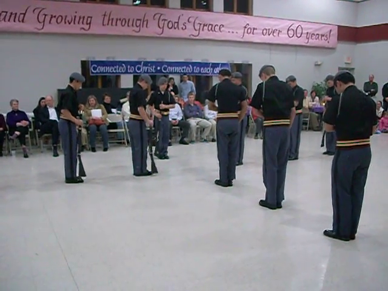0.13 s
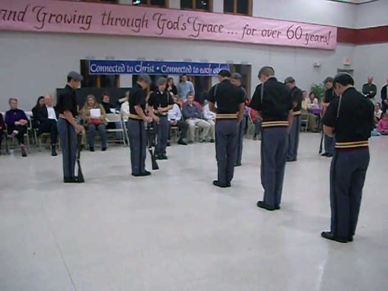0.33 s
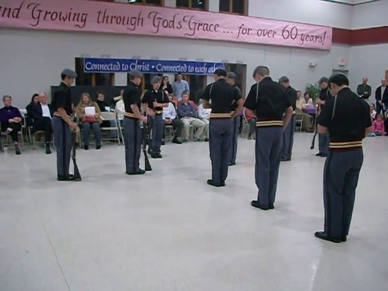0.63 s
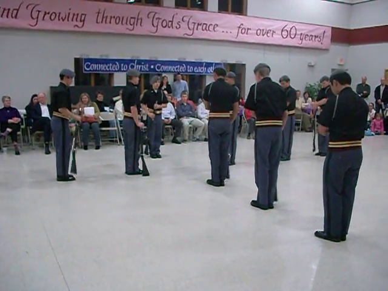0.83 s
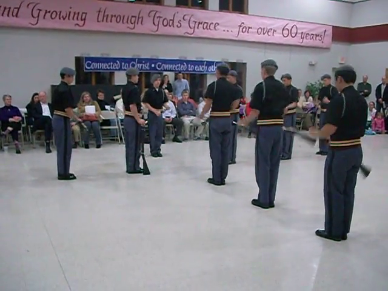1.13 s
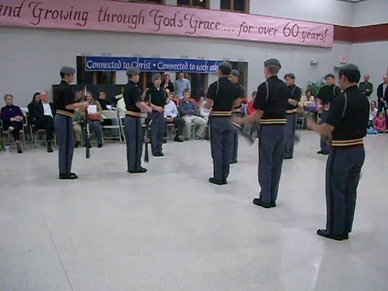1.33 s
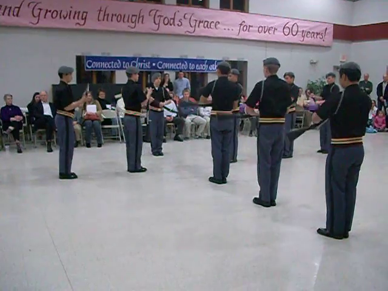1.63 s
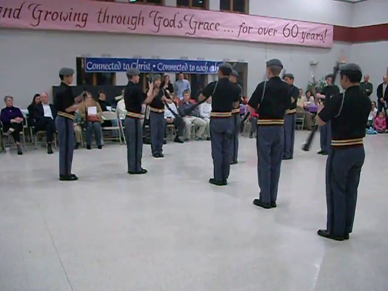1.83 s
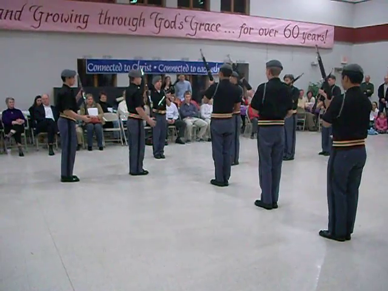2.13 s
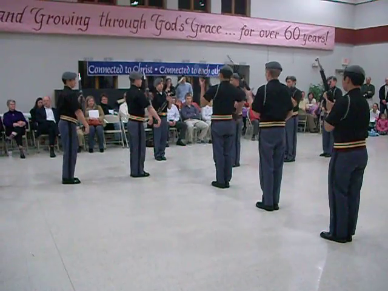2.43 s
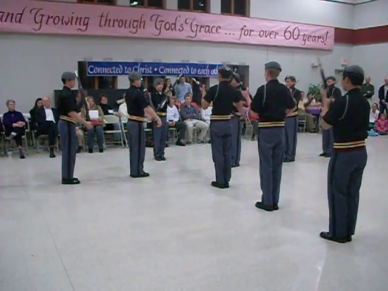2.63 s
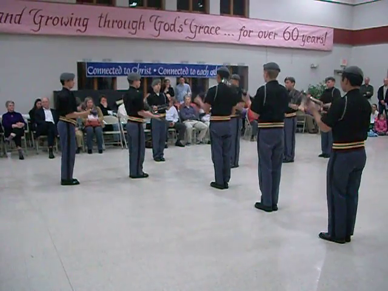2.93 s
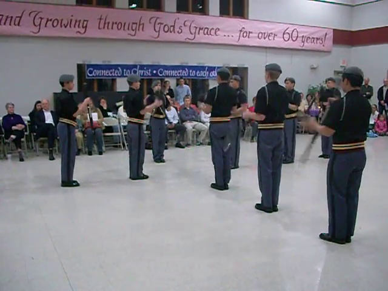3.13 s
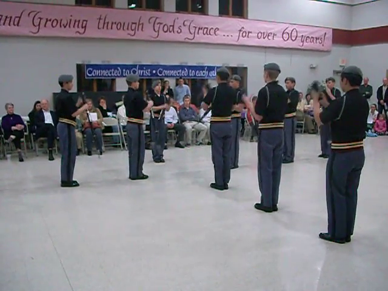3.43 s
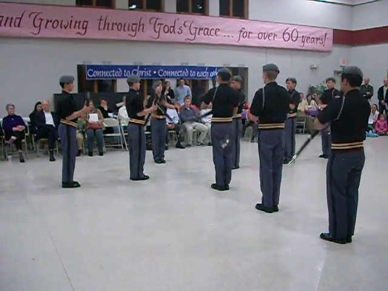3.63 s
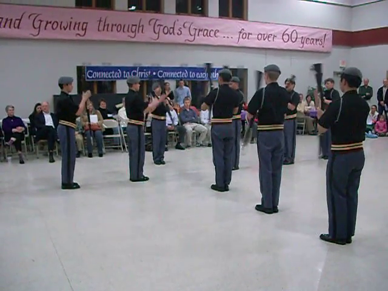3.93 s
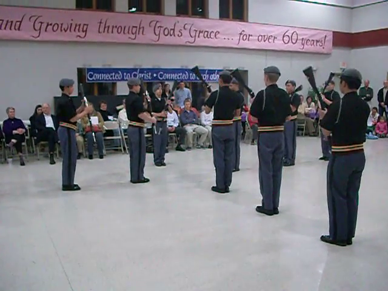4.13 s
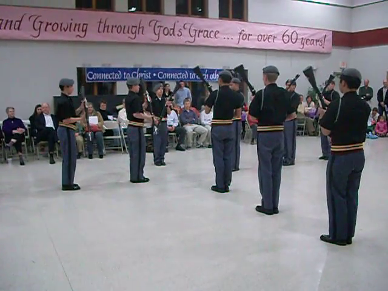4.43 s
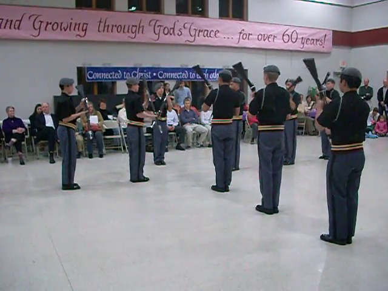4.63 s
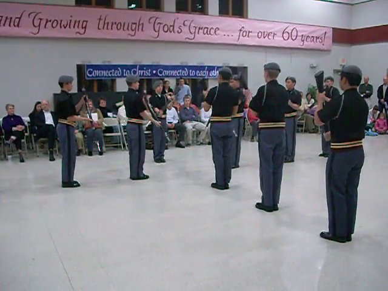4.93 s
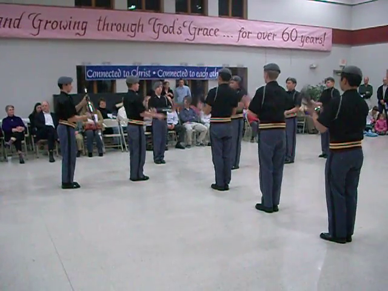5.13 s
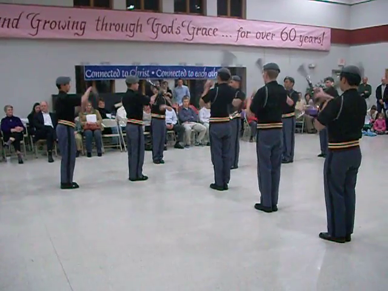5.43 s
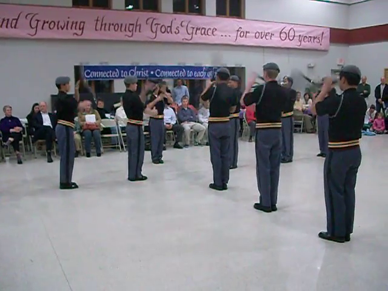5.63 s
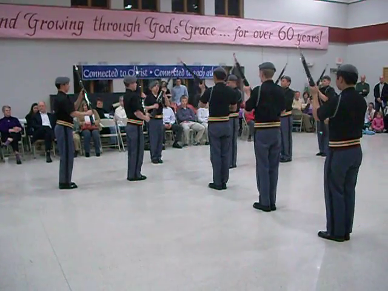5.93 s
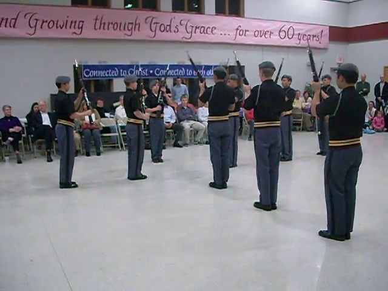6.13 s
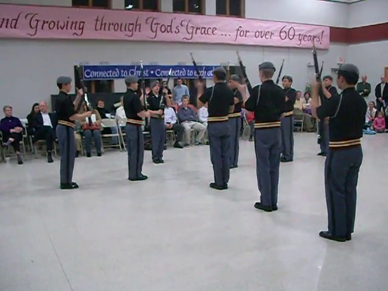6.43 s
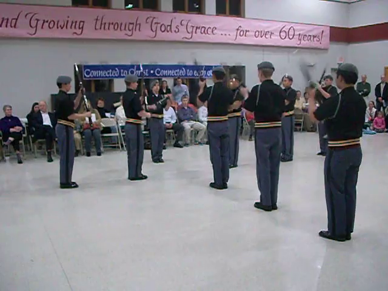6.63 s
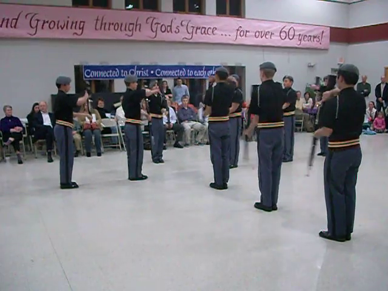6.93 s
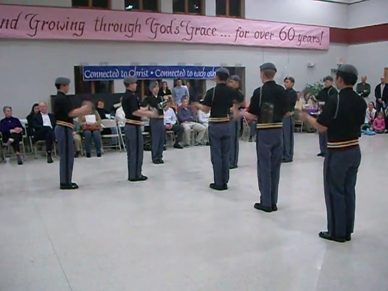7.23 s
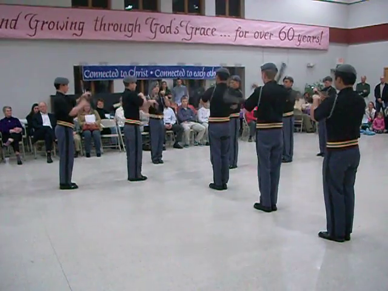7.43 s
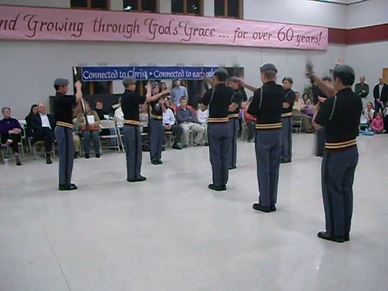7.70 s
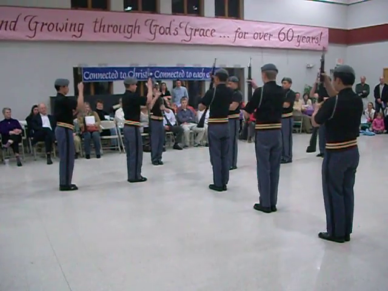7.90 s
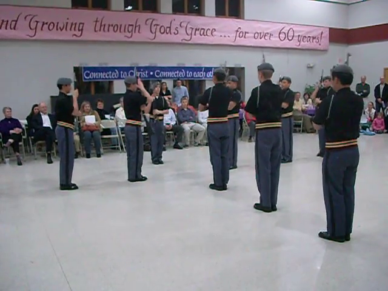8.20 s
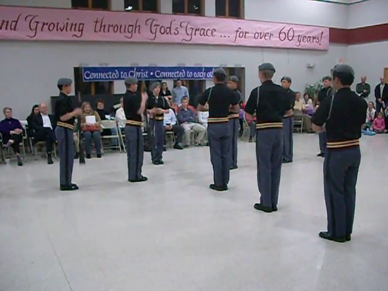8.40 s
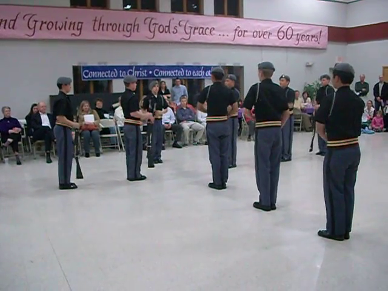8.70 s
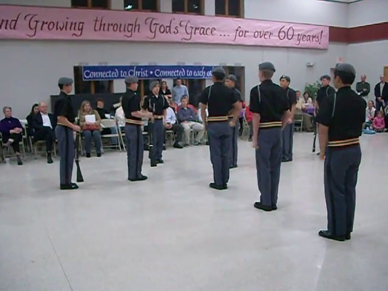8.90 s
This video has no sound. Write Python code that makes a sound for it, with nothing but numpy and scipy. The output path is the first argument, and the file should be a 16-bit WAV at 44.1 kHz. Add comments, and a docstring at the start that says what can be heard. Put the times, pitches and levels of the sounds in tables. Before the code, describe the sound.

A drill team handles rifles in a hard-floored hall, heard from a short distance on a small, narrow-band camera microphone over steady low ventilation rumble and faint hiss. Immediately at 0 s, then at about 0.4 and 0.8 s, loud ragged volleys of rifle butts boom on the floor, mixed with bright cracks and a little steel ring, distorting at the peaks. A looser clack follows at 1.6 s. Softer slaps come at 2.0, 2.45 and 2.85 s, growing at 3.3 and 3.7 to a strong woody burst at 4.07 s. A weak one follows at 4.85 s, a hard crack at 5.75, a medium clatter at 6.5, and the loudest clack at 7.7 s. Small swivel ticks fill gaps. Each burst smears over about a tenth of a second and leaves under a second of echo. After a quiet pause, one faint tap and thud lands at 8.93 s.

```python
"""Rifles handled by a drill team, never quite in unison, in a hard-floored hall.
Clacks layer a noise crack, a hollow knock, a rattle and ringing modes; they come in ragged bursts.
Early on, three volleys of butts thud as floor modes, plate ring and low noise; a faint one comes late.
The hall answers with sparse reflections and a banded noise tail, over ventilation of coloured noise.
A small camera with a narrow band overloads on the loudest blows."""
import sys
import numpy as np
from scipy import signal
from scipy.fft import rfft, irfft, next_fast_len
from scipy.io import wavfile
from scipy.ndimage import uniform_filter1d

SR = 44100
rng = np.random.default_rng(int(sys.argv[2]) if len(sys.argv) > 2 else 0)


def to_wav(s):
    """Save 16-bit WAV."""
    ch = np.atleast_2d(s).T  # columns
    pcm = np.round(np.clip(ch, -1, 1) * 32767)  # PCM
    wavfile.write(sys.argv[1], SR, pcm.astype(np.int16))


N = 399546  # samples

# Levels in the tables are set ahead of the hall mix and the camera.
# clacks that stand out of their move: start_s, level_db, nearness_db
LOUD_CLACKS = [(0.002, -2.5, -4.5), (0.045, -2, -1.5), (0.083, -10, 6), (0.099, -9, 4), (0.355, -7.5, -2.5),
               (0.391, -6, 2), (0.402, -7, 1), (0.461, -3, 1.5), (0.699, -7.5, 0.5), (0.766, -3.5, -2),
               (0.786, -3.5, 1), (0.8, -8.5, 4), (0.841, -4.5, 6), (1.558, -22, 4.5), (1.57, -15.5, 5.5),
               (1.595, -6.5, 0), (1.636, -8, -2.5), (1.65, -7, 3), (2.003, -19.5, 3.5), (2.059, -16.5, -2),
               (2.464, -13.5, 3), (2.506, -19.5, -2.5), (2.842, -23.5, 3.5), (2.888, -17.5, -12),
               (2.91, -12.5, 1), (3.217, -18, 2.5), (3.26, -11, 0), (3.275, -10, -2), (3.312, -9, -2),
               (3.634, -12, -6.5), (3.67, -10, -0.5), (3.693, -5, 2), (4.052, -3.5, -1.5),
               (4.06, -2.5, 2.5), (4.075, -7.5, 0.5), (4.115, -8, -1), (4.82, -21, -6), (4.88, -11.5, -6),
               (4.913, -14, 3.5), (5.708, -5.5, -1.5), (5.729, -1.5, -7), (5.774, -3, 2.5),
               (5.794, -4, 8.5), (6.457, -8.5, -9.5), (6.471, -7.5, -0.5), (6.5, -5, 1), (6.549, -13, -4),
               (6.577, -10.5, -3), (7.673, -23.5, 1), (7.693, 1, 3.5), (7.705, 4.5, 2.5), (7.724, 1.5, -3),
               (7.745, -0.5, 7.5), (7.768, -5, 2), (8.933, -32, 9)]
# drill moves, each a ragged burst of contacts along the ranks:
# start_s, length_s, contact_level_db, body_db (wooden), edge_db (metallic), knock_hz, knock_db
DRILL_MOVES = [(0.005, 0.098, -13.5, -2.5, -4.5, 1450, -14.5), (0.369, 0.1, -11.5, -2.5, -5, 1280, -9.5),
               (0.767, 0.081, -10.5, -3.5, -4.5, 1402, -12.5),
               (1.589, 0.074, -15.5, -7.5, -5.5, 664, -12.5), (2.023, 0.071, -24.5, 1.5, -2, 1280, -14),
               (2.416, .1, -23, -5, -13, 978, -8), (2.808, 0.094, -22.5, -5.5, -5.5, 1140, -16),
               (3.263, 0.079, -16, -4, -8, 1020, -13.5), (3.665, .055, -14.5, -8, -12, 1250, -17.5),
               (4.06, 0.059, -14, -2.5, -8.5, 1474, -14.5), (4.801, 0.11, -25, -6, -5.5, 1294, -16),
               (5.73, 0.084, -11.5, -4, -4, 825, -20.5), (6.472, .11, -20, -3, -7, 940, -13.5),
               (7.694, 0.084, -7, -5.5, -10, 770, -12.5), (8.922, 0.055, -31, 6, -13, 637, -11)]
# sling swivels ticking between the moves: start_s, level_db, edge_db (metallic)
SWIVEL_TICKS = [(0.19, -22.5, 8.5), (0.893, -13.5, 2.5), (0.94, -23, 6.5), (1.252, -34, 4),
                (3.523, -38.5, 9), (5.074, -32.5, -5), (5.229, -38, 7), (6.104, -33.5, 8.5),
                (7.225, -26.5, -10), (7.305, -30, 11.5), (7.327, -33, 7), (8.132, -29.5, -11),
                (8.558, -33, 11), (8.578, -29.5, -19)]
# ringing of a rifle: pitch_hz, level_db, t60_s
RIFLE_RING = [(610, -32.5, 0.05), (745, -39, 0.053), (846, -42.5, 0.079), (1410, -29.5, 0.083),
              (1600, -54.5, 0.087), (2440, -36.5, .025), (2660, -38.5, 0.025), (3330, -32, 0.064),
              (3800, -46.5, 0.035), (4900, -49.5, 0.05)]
# colour of a contact: frequency_hz, gain_db
CRACK_COLOUR = [(100, -6.5), (250, -3), (480, -6), (720, 3), (1000, 2), (1400, 2), (1850, 1.5), (2700, 3.5),
                (4000, 5), (5200, 7.5), (7000, 16.5)]
# rifle butts on the floor: start_s, level_db, plate_ring_db
BUTT_BLOWS = [(0.003, -5, 1.5), (0.025, -7.5, -2), (0.05, -4, 0.5), (0.095, -3.5, -2), (0.188, -12, 1),
              (0.359, -13, 2), (0.382, -1.5, -5), (0.4, -11, 15), (0.431, -4.5, -6), (0.462, -4.5, 0),
              (0.691, -15, -2), (0.768, -4, -2), (0.783, -2, 2), (0.8, -11, 15), (0.819, -3.5, -0.5),
              (0.841, -5.5, 0.5), (8.936, -29.5, -6)]
# boom of the floor under a butt: pitch_hz, level_db, t60_s
FLOOR_BOOM = [(37.7, -3.5, 0.078), (73.3, -3, 0.12), (100.3, -11.5, 0.34), (119.1, -7.5, 0.23),
              (158.3, -5.5, 0.1), (227, -9, 0.15), (282.7, -15.5, 0.17)]
# ring of the steel plate on a rifle butt: pitch_hz, level_db, t60_s
PLATE_RING = [(1242, -18.5, 0.058), (1349, -18.5, 0.074), (1515, -23, 0.036)]
# colour of the hall's echo: frequency_hz, gain_db
ECHO_COLOUR = [(40, 1.5), (110, 2), (300, -5.5), (800, 3), (2000, -2.5), (3500, -1), (5500, -4)]
# decay of the hall: frequency_hz, t60_s
ECHO_T60 = [(40, 0.92), (110, 1.15), (300, 0.7), (800, 0.74), (2500, 0.76), (5500, 0.63)]
# spectrum shape of the ventilation and hiss: frequency_hz, relative_level_db
AIR_COLOUR = [(12, -48), (20, -19.5), (27, -1), (69, -1.5), (112, -4), (196, -4), (277, -7), (326, -8),
              (808, -17.5), (930, -19.5), (1260, -18), (1350, -24.5), (1450, -20), (2770, -25), (5200, -28),
              (6760, -26.5), (11400, -120)]
# fan tones: pitch_hz, rms_db, width_hz
FAN_TONES = [(76.8, -54, 5), (174.4, -62.5, 16), (247.8, -49.5, 9), (1330, -55.5, 14)]
# upper edge of the camera's band: frequency_hz, gain_db
CAMERA_EDGE = [(5050, 0), (5300, -5), (5500, -13), (5750, -17), (6000, -29), (6300, -54), (6700, -95)]

# cadets heard only as part of the burst, their spread in strength and their nearness
RANK_COUNT, RANK_SPREAD_DB, RANK_NEAR_DB = 6, 2, -2
# what all swivel ticks share
TICK_BODY_DB, TICK_KNOCK_HZ, TICK_KNOCK_DB, TICK_NEAR_DB = -4, 1300, -18, 2.5
PLACES = 11  # spots in the ranks, each with its own echo


def clacks(crack_t60=0.027, settle_s=0.00097, rattle_db=-18, rattle_t60=0.13, ring_db=3,
           knock_t60=0.028, knock_detune=0.079, colour_share=0.65):
    """A hard crack, a hollow knock, a rattle of fittings and barrel ring: (start_s, sound, nearness_db) each."""
    blows, touches = [], contacts()
    t = np.arange(SR // 10) / SR
    crack = dying(t, crack_t60)
    rattle = from_db(rattle_db) * dying(t, rattle_t60)
    pressure = 0.5 * (crack + rattle)
    landing = 1 - np.exp(-t / settle_s)  # a hand takes a moment to land fully
    chatter = band(rng.standard_normal((len(touches), len(t))), 6060, "low")
    # level out the noise over 60 samples so the envelope alone shapes it
    chatter /= np.sqrt(np.abs(uniform_filter1d(chatter ** 2, size=60)) + 1e-9)
    for grain, touch in zip(chatter, touches):
        start_s, level_db, body_db, edge_db, knock_hz, knock_db, near_db = touch
        # no two hands land on quite the same spot
        pitch_hz = knock_hz * np.exp(knock_detune * rng.standard_normal())
        knock = from_db(knock_db) * dying(t, knock_t60) * np.sin(2 * np.pi * pitch_hz * t)
        ring = from_db(ring_db) * struck(RIFLE_RING, t, spread_db=0.5, detune=0.035)
        # a palm on the stock is woody, a knock on the fittings is bright;
        # colour_share sets how much of this lean reaches the sound
        lean = [(1300, body_db), (2000, 0.022), (3200, 0), (4400, edge_db)]
        colour = [(hz, db + colour_share * at_hz(lean, hz)) for hz, db in CRACK_COLOUR]
        clack = coloured(landing * (grain * pressure + knock + ring), colour)
        blows.append((start_s, from_db(level_db) * clack, near_db))
    return blows


def contacts():
    """Uneven touches that share their move's colour, as all cadets strike the same part of the rifle.

    Rows: start_s, level_db, body_db, edge_db, knock_hz, knock_db, nearness_db."""
    rows = []
    middles = np.array([start + length / 2 for start, length, *_ in DRILL_MOVES])
    for start_s, level_db, near_db in LOUD_CLACKS:
        colour = DRILL_MOVES[np.argmin(np.abs(middles - start_s))][3:]  # from the nearest move
        rows.append((start_s, level_db, *colour, near_db))
    for start_s, length_s, level_db, *colour in DRILL_MOVES:
        # cadets land one after another, each at random within an equal slot
        lateness = (np.arange(RANK_COUNT) + rng.random(RANK_COUNT)) / RANK_COUNT
        strengths = level_db + RANK_SPREAD_DB * rng.standard_normal(RANK_COUNT)
        for late, db in zip(lateness, strengths):
            rows.append((start_s + length_s * late, db, *colour, RANK_NEAR_DB))
    for start_s, level_db, edge_db in SWIVEL_TICKS:
        rows.append((start_s, level_db, TICK_BODY_DB, edge_db,
                     TICK_KNOCK_HZ, TICK_KNOCK_DB, TICK_NEAR_DB))
    return rows


def butts(level_db=-2, near_db=0.5, push_s=0.0039, thump_db=-9, thump_t60=0.095, thump_hz=320):
    """A heavy push booms the floor and rings the butt plate: (start_s, sound, nearness_db) each."""
    blows = []
    t = np.arange(SR // 3) / SR
    push = 1 - np.exp(-t / push_s)
    for start_s, butt_db, plate_db in BUTT_BLOWS:
        noise = rms_one(band(rng.standard_normal(len(t)), thump_hz, "low", order=4))
        thump = from_db(thump_db) * noise * dying(t, thump_t60)
        boom = struck(FLOOR_BOOM, t, spread_db=1.5, detune=0.063)
        plate = from_db(plate_db) * struck(PLATE_RING, t, spread_db=2, detune=0.015)
        blow = (boom + plate + thump) * push
        blows.append((start_s, from_db(butt_db + level_db) * blow, near_db))
    return blows


def struck(modes, t, spread_db, detune):
    """Decaying sine modes; each blow rings them with its own strengths and slightly its own pitch."""
    hz, db, t60 = np.transpose(modes)[:, :, None]
    strength, pitch = rng.standard_normal((2, len(modes), 1))
    sign = rng.choice([-1, 1], (len(modes), 1))
    gain = sign * from_db(db + spread_db * strength)
    tones = np.sin(2 * np.pi * hz * (1 + detune * pitch) * t)
    return np.sum(gain * dying(t, t60) * tones, axis=0)


def hall(blows):
    """Blows take the places in the ranks in turn, each with its echo; near ones have more direct sound."""
    out, places = np.zeros(N), echoes()
    for k, (start_s, sound, near_db) in enumerate(blows):
        add(out, start_s, from_db(near_db) * sound)
        add(out, start_s, signal.fftconvolve(sound, places[k % PLACES]))
    return out


def echoes(wet_db=-4, early_db=-4, early_t60=0.25, build_s=0.0048, mirrors_per_s=1500):
    """The hall heard from each place: sparse reflections and a noise tail that dies band by band."""
    t = np.arange(SR) / SR
    white = rng.standard_normal((2, PLACES, SR))
    tail = 0
    edges = np.geomspace(25, 9000, num=13)
    for k, (low, high) in enumerate(zip(edges, edges[1:])):
        hz = np.sqrt(low * high)
        decay = from_db(at_hz(ECHO_COLOUR, hz)) * dying(t, at_hz(ECHO_T60, hz))
        tail = tail + band(white[k % 2], [low, high], "band") * decay  # neighbours use different noise
    hits = rng.random((PLACES, SR)) < mirrors_per_s / SR
    mirrors = hits * rng.choice([-1, 1], (PLACES, SR)) * dying(t, early_t60)
    onset = 1 - np.exp(-(t / build_s) ** 2)
    early = from_db(early_db) * rms_one(mirrors * onset) / np.sqrt(SR)
    return early + from_db(wet_db) * tail * onset / np.sqrt(SR / 20)


def ventilation(air_db=-35.5):
    """Steady rumble and hiss from coloured noise, with wavering fan tones from noise through resonators."""
    air = band(coloured(rng.standard_normal(N), AIR_COLOUR), 6800, "low")
    out = from_db(air_db) * rms_one(air)
    for hz, db, width_hz in FAN_TONES:
        r = np.exp(-np.pi * width_hz / SR)  # a pole nearer 1 gives a narrower tone
        poles = [1, -2 * r * np.cos(2 * np.pi * hz / SR), r * r]
        tone = signal.lfilter([1, 0, -1], poles, rng.standard_normal(N))
        out += from_db(db) * rms_one(tone)
    return out


def from_db(db):
    """Decibels to gain."""
    return 10 ** (np.asarray(db) / 20)


def rms_one(x):
    """Scale to unit rms."""
    return x / np.sqrt(np.mean(x ** 2) + 1e-20)


def at_hz(points, hz):
    """Read a table on a log-frequency axis."""
    knots, values = np.transpose(points)
    return np.interp(np.log(np.maximum(hz, 1)), np.log(knots), values)


def coloured(x, spectrum):
    """Causal (minimum-phase) filter with the given spectrum."""
    size = next_fast_len(len(x) + SR // 20, real=True) // 2 * 2
    log_gain = np.log(from_db(at_hz(spectrum, np.fft.rfftfreq(size, 1 / SR))))
    cepstrum = irfft(log_gain)[:size // 2]
    cepstrum[1:] *= 2  # folding the cepstrum makes the phase minimum
    response = np.exp(rfft(cepstrum, size))
    return irfft(rfft(x, size) * response)[:len(x)]


def band(x, hz, kind, order=2):
    """Butterworth filter."""
    return signal.sosfilt(signal.butter(order, hz, kind, fs=SR, output="sos"), x)


def dying(t, t60):
    """Envelope that loses 60 dB in t60 seconds."""
    return np.exp(-np.log(1000) * t / t60)


def add(track, start_s, sound):
    """Mix a sound into the track at its start time."""
    at = max(int(start_s * SR), 0)
    track[at:at + len(sound)] += sound[:max(N - at, 0)]


def scene():
    """Rifles in the hall, over the ventilation."""
    rifles = from_db(2) * hall(clacks() + butts())
    return (rifles + ventilation())[None]


def record(dry, overload=0.95, ceiling=0.72, hiss_db=-69):
    """The camera input overloads, its band is cut off over faint hiss, and the highest crests are flattened."""
    overloaded = overload * np.tanh(dry[0] / overload)
    narrow = coloured(overloaded, CAMERA_EDGE)
    hiss = from_db(hiss_db) * rms_one(band(rng.standard_normal(N), 7000, "low"))
    steep = signal.ellip(10, 0.2, 80, 6150, fs=SR, output="sos")
    flattened = np.clip(signal.sosfilt(steep, narrow + hiss), -ceiling, ceiling)
    # a last low-pass trims the harmonics of the flattening, 70 dB down from 17 kHz
    smooth = signal.cheby2(12, 70, 17000, fs=SR, output="sos")
    return signal.sosfilt(smooth, flattened)[None]


dry = scene()
out = record(dry)
to_wav(out)
```